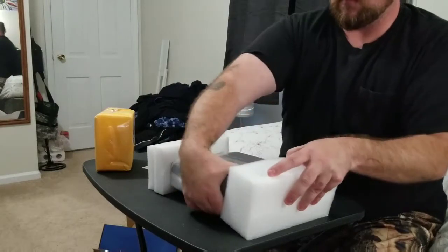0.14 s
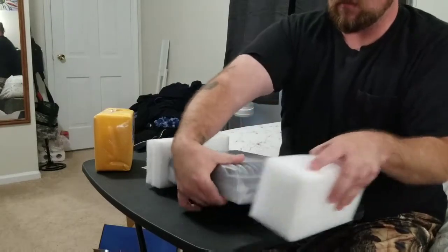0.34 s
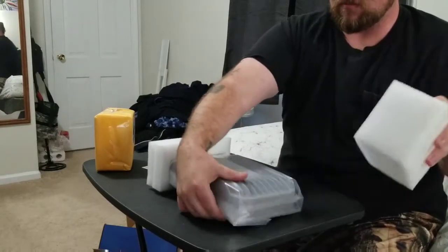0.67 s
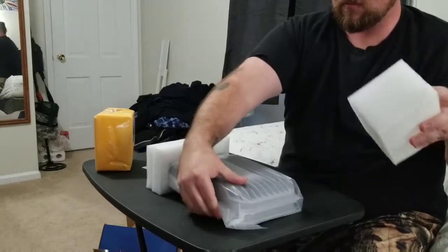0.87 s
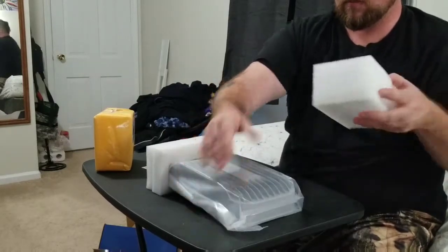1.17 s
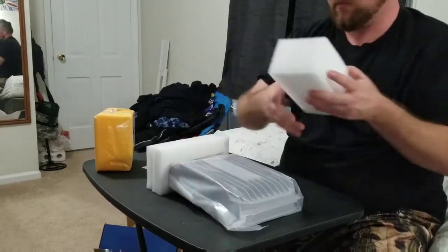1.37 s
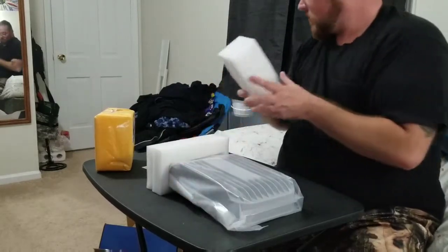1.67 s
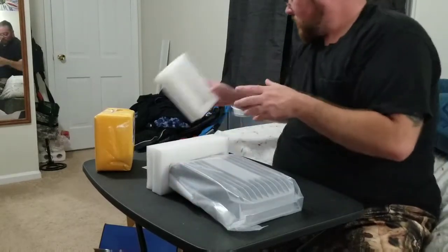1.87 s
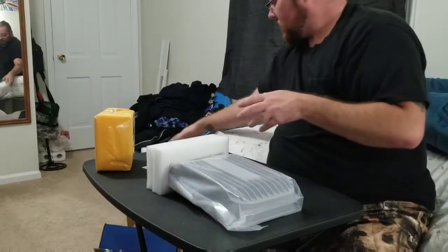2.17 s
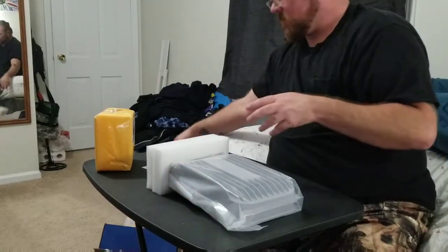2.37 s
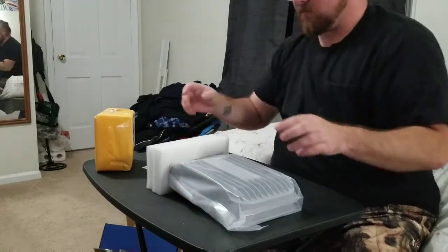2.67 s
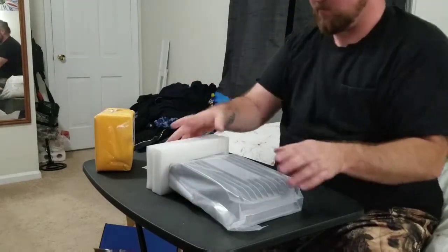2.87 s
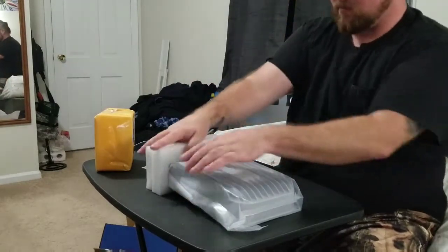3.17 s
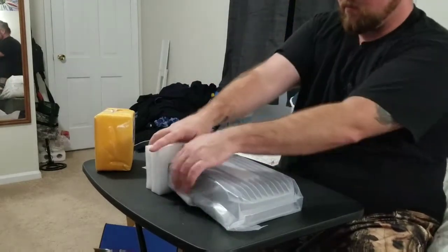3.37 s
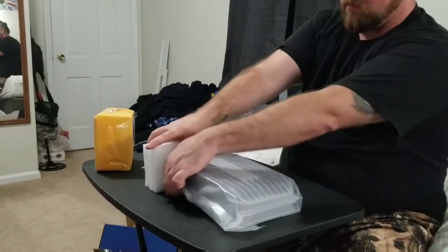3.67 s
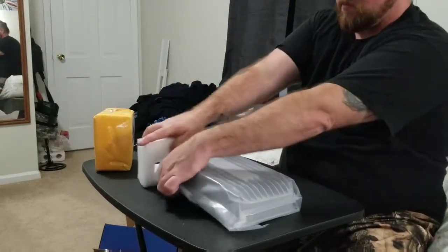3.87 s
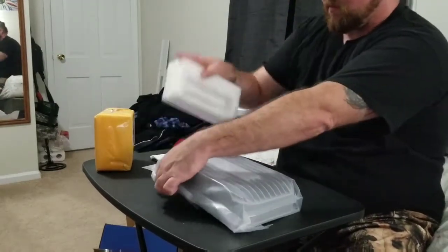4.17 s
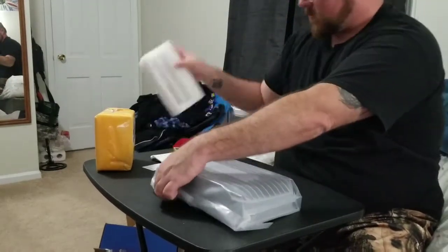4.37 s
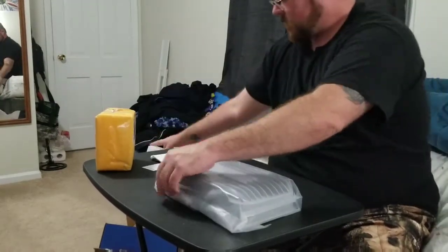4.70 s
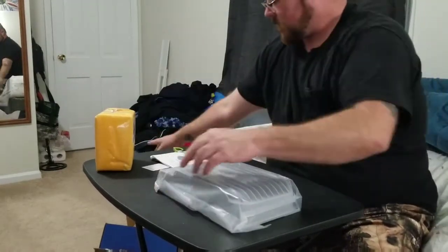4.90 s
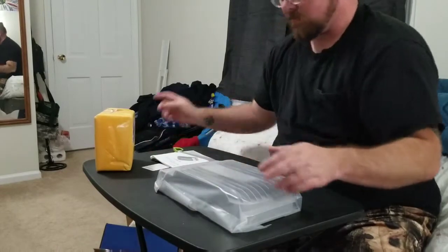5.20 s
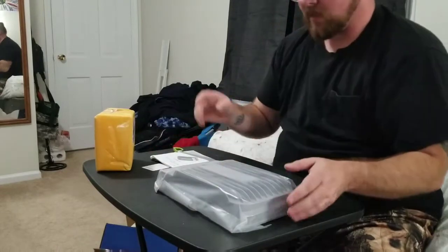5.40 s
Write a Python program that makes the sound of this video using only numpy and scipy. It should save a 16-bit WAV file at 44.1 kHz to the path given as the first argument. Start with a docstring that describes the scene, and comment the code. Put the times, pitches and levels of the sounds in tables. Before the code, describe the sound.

Hands unpack a film-wrapped object: a hollow foam rub and knocks, the object set down with a low thump, a dense burst of plastic crackle, a light tap on foam, a pause, a muffled landing. Then palm slides and sparse film ticks, another softer thump with crinkle, a faint bump. Dry carpeted room, low rumble and faint hiss, near microphones.

```python
"""Hands pull foam blocks off a thing wrapped in plastic film, on a light table in a carpeted bedroom.
Film snaps are short decaying tones with a bright tick; crackle is random clicks, a palm slide is noise.
Random pushes ring the foam, the table and landing blocks; soft blows ring the knocked blocks.
Squeaks are narrow noise. Echoes give the room; shaped noise gives the house's low rumble and hum
and the hiss of two microphones."""
import sys
import numpy as np
from scipy import signal
from scipy.fft import rfft, irfft, next_fast_len
from scipy.io import wavfile
from scipy.ndimage import uniform_filter1d

SR = 44100
rng = np.random.default_rng(int(sys.argv[2]) if len(sys.argv) > 2 else 0)


def generate_wav(sig):
    """Save sig (samples, or channels by samples) to the path in sys.argv[1] as 16-bit PCM at SR."""
    pcm = np.round(np.clip(np.atleast_2d(sig).T, -1, 1) * 32767).astype(np.int16)
    wavfile.write(sys.argv[1], SR, pcm)


N = 244573  # length in samples
STEP = 20  # samples between two points of a slow loudness curve


def from_db(db):
    """Turn decibels into a plain multiplier."""
    return 10 ** (np.asarray(db) / 20)


def rms_one(x):
    """Scale a sound so that its average strength (rms) is 1."""
    return x / np.sqrt(np.mean(x ** 2) + 1e-20)


def panned(x, pan_db, lag=1):
    """Place one sound between left and right; the left side hears it a few samples later."""
    gains = from_db(np.array([pan_db, -pan_db]) / 2).reshape(2, -1)
    left, right = x * gains
    return np.array([np.roll(left, lag), right])


def coloured(x, spectrum):
    """Filter a sound to follow a spectrum, with no sound ahead of its cause (minimum phase); rms 1."""
    hz, db = np.transpose(spectrum)
    grid = np.maximum(np.fft.rfftfreq(8192, 1 / SR), 1)
    log_gain = np.interp(np.log(grid), np.log(hz), db) * np.log(10) / 20
    # folding the cepstrum onto its first half makes the filter minimum-phase
    cepstrum = irfft(log_gain)
    cepstrum[1:4096] *= 2
    cepstrum[4097:] = 0
    response = irfft(np.exp(rfft(cepstrum)))
    return rms_one(signal.fftconvolve(np.atleast_2d(x), response[None])[:, :N])


def resonator(hz, t60):
    """Feedback of one ringing tone that fades by 60 dB in t60 seconds, and its angle per sample."""
    r, w = from_db(-60 / (t60 * SR)), 2 * np.pi * hz / SR
    return [1, -2 * r * np.cos(w), r * r], w


def ring(force, hz, t60):
    """A force sets one tone ringing; a single unit click would start a sine of height 1."""
    feedback, w = resonator(hz, t60)
    return signal.lfilter([0, np.sin(w)], feedback, force + 1e-18)


def shake(force, modes):
    """A force drives several ringing tones that let little through far below or above their pitch."""
    out = 0
    for hz, db, t60 in modes:
        feedback, _ = resonator(hz, t60)
        out = out + from_db(db) * signal.lfilter([1, 0, -1], feedback, force + 1e-18)
    return out


def grains(per_s, spread_db):
    """Random clicks of uneven size, pushing either way."""
    sizes_db = spread_db * np.minimum(rng.exponential(1, N), 4)
    signs = rng.choice([-1, 1], N)
    return from_db(sizes_db) * signs * (rng.random(N) < per_s / SR)


def driven(gains, bodies, soft_hz):
    """Uneven pushes follow each gain and ring one body; a low-pass then softens the sum."""
    out = 0
    for gain, modes in zip(gains, bodies):
        bumps = grains(2000, 1.5)
        out = out + shake(bumps * gain, modes) / np.std(shake(bumps, modes))
    return signal.sosfilt(signal.butter(3, soft_hz, fs=SR, output="sos"), out)


RISE_DB = 13.5  # how far below its top a swell sets in


def swells(rows, linger):
    """Each event rises, holds, then fades steadily in dB; gains are events x layers x time."""
    t = np.arange(0, N + STEP, STEP) / SR
    share = np.array(linger)[:, None]
    out = []
    for start, rise, hold, fade, *top_db in rows:
        since, rise = t - start, max(rise, 1e-3)  # no rise is shorter than 1 ms
        rising_db = -RISE_DB * np.clip(1 - since / rise, 0, 1)
        fading_db = -fade * np.maximum((since - rise) / share - hold, 0)
        layers_db = np.array(top_db[:len(share)])[:, None]
        out.append(from_db(layers_db + rising_db + fading_db) * (since >= 0))
    return np.array(out)


def summed(gains):
    """Overlapping events add in power, giving one gain per layer at every sample."""
    curves = np.sqrt(np.sum(gains ** 2, axis=0))
    return [np.interp(np.arange(N) / STEP, np.arange(len(g)), g) for g in curves]


# narrow squeaks and hoots of rubbed foam, levels before panning:
# (start t/s, length t/s, pitch f/Hz, width f/Hz, level/dB)
SQUEAKS = [(-.04, 0.125, 790, 110, -37), (2.134, 0.058, 3050, 200, -78), (2.285, 0.034, 1390, 100.4, -79),
           (3.024, 0.097, 1740, 400, -63.5), (4.111, 0.025, 1480, 99, -63.5),
           (4.116, 0.051, 1090, 150, -66.5), (4.27, 0.037, 1810, 70, -74), (5.242, 0.11, 446, 49.3, -63.5),
           (5.517, 0.049, 1660, 200, -67.5)]


def squeaks():
    """Rubbed foam squeaks: short narrow bands of noise that swell and fade."""
    out, t, noise = 0, np.arange(N) / SR, rng.standard_normal(N)
    for start, length, hz, width, db in SQUEAKS:
        swell = np.sin(np.pi * np.clip((t - start) / length, 0, 1))
        t60 = np.log(1000) / np.pi / width  # a narrower band rings longer
        out = out + from_db(db) * swell * rms_one(shake(noise, [(hz, 0, t60)]))
    return out


# hand movements, levels before filtering and panning; the linger shares stretch hold and fade:
# (start t/s, rise t/s, hold t/s, fade level/dB per s, crumple level/dB, slide level/dB,
#  foam hollow level/dB, foam walls level/dB, left-over-right level/dB)
MOVES = [(0.0, 0.00081, 0.051, 208, -44.5, -53, -38.5, -40.5, 1.5),
         (0.096, 0.11, 0.06, 200, -61, -65, -62.5, -58.5, 1.5),
         (0.265, 0.013, 0.0025, 450, -48.5, -50, -58, -47, 1.5),
         (0.296, 0.026, 0.032, 174, -53.5, -52.5, -58, -53.5, 2),
         (0.379, 0.003, 0.0068, 355, -51, -72, -49.5, -49.5, 6),
         (0.542, 0.022, 0.06, 295, -53, -62.5, -63, -44.5, 2),
         (0.689, 0.06, .005, 300, -57, -60, -52.5, -51, 5),
         (0.803, .006, .003, 450, -56, -61, -51, -72, -3),
         (0.818, 0.051, 0.013, 190, -40.5, -49.5, -51, -45.5, 1.5),
         (0.93, 0.11, 0.032, 88, -61, -64.5, -60.5, -55.5, 6),
         (1.183, 0.0039, 0.0045, 142, -47.5, -54.5, -68, -60.5, 4.5),
         (1.315, 0.0094, 0.017, 211, -65.5, -88, -90, -79, 4.5),
         (1.468, 0.0089, 0.025, 193, -60, -57.5, -61.5, -55.5, -1),
         (1.536, 0.04, 0.058, 212, -71.5, -60.5, -69.5, -62, 10),
         (1.723, 0.0081, 0.046, 304, -65, -62, -53, -55, 1),
         (1.832, 0.11, 0.032, 242, -73, -66.5, -75, -79, 3),
         (2.114, 0.056, .02, 202, -88, -80, -84, -88, 5.5),
         (2.272, 0.032, .012, 250, -88, -77, -80, -86.5, 0),
         (2.504, 0.014, 0.03, 192, -52.5, -53.5, -46, -45.5, 1),
         (3.038, 0.044, 0.12, 124, -57.5, -55, -70.5, -85, 2),
         (3.344, 0.0054, 0.0096, 222, -52, -59.5, -65.5, -56, 2),
         (3.364, 0.064, 0.022, 206, -61, -59, -87, -72, 1),
         (3.462, 0.013, .003, 193, -51, -53.5, -78, -52.5, 4),
         (3.523, 0.08, 0.021, 282, -52, -53.5, -61, -62, 3),
         (3.69, 0.076, 0.004, 218, -50, -52.5, -65.5, -53.5, 3),
         (3.805, 0.073, 0.04, 112, -56.5, -62, -75, -56.5, 3),
         (3.868, 0.066, .012, 170, -61, -55, -65, -57, 14),
         (3.986, 0.011, .005, 200, -76, -61.5, -66, -74, 6),
         (4.09, .04, 0.033, 194, -83, -71.5, -68.5, -72, 1.5),
         (4.196, 0.12, .025, 89, -81, -66.5, -78, -76, -1),
         (4.394, .07, 0.023, 170, -84, -71.5, -77.5, -92, 8),
         (4.563, 0.0093, 0.035, 150, -67, -72, -68, -72, 7),
         (4.636, 0.073, 0.0068, 400, -50.5, -58, -58, -52, 3.5),
         (4.768, 0.016, 0.0043, 255, -60, -53, -81, -77, 16),
         (5.074, 0.029, 0.004, 292, -62.5, -60, -47.5, -50, 8),
         (5.151, 0.1, 0.018, 246, -64.5, -62, -59, -58, 4),
         (5.499, 0.043, .025, 203, -76, -71, -68.5, -75, 6)]
# how long film, palm, hollow and walls go on: (share of hold and fade time [no unit], one per layer)
MOVE_LINGER = [0.94, 1.01, 0.85, 0.75]


def hand_moves():
    """One hand movement drives film, palm and foam; the side follows the loudest film movement."""
    moves = swells(MOVES, MOVE_LINGER)
    loudest = np.argmax(moves[:, 0], axis=0).repeat(STEP)[:N]
    pan_db = uniform_filter1d(np.array(MOVES)[loudest, -1], size=200)
    return summed(moves), pan_db


# tone colour of crumpling film: (f/Hz, relative level/dB per Hz)
CRACKLE = [(350, -16.5), (600, -30), (678, -26.5), (746, 1), (2280, 3), (4140, -2), (6400, -7), (9370, -39),
           (14300, -30), (15500, -27.5)]


def crackle(gain):
    """Crumpling film: many random clicks, coloured by the sheet."""
    return gain * coloured(grains(4000, 3), CRACKLE)[0]


# tone colour of a palm on foam: (f/Hz, relative level/dB per Hz)
SLIDE = [(350, -34), (600, -8.5), (1060, -17), (1170, -4), (1340, -6.5), (1460, -3), (1940, -1),
         (2440, -14), (2920, -7.5), (4330, -7), (7890, -3.5), (9040, -13), (12900, -9), (15600, -10)]


def slide(gain):
    """A palm rubs over foam: coloured noise, separate on each side, slightly stronger on the left."""
    return gain * coloured(rng.standard_normal((2, N)), SLIDE) * from_db([[.8], [-.8]])


# air in the block's pocket: (f/Hz, relative level/dB, time to fade by 60 dB t/s)
HOLLOW = [(445, 8.5, 0.025), (519, 4, 0.024), (571, -6, 0.089)]
# walls of the foam block: (f/Hz, relative level/dB, time to fade by 60 dB t/s)
WALLS = [(725, -2, 0.019), (789, -13.5, 0.018), (879, 0, 0.023), (997, -1.5, 0.016), (1085, -1, 0.013),
         (1267, -2, 0.02)]


def foam(hollow, walls):
    """Handled foam: small pushes ring the air in its pocket and its walls."""
    return panned(driven([hollow, walls], [HOLLOW, WALLS], soft_hz=2000), 1.5, 9)


# weight coming down on the table, levels before softening; the linger shares stretch hold and fade:
# (start t/s, rise t/s, hold t/s, fade level/dB per s, top level/dB, frame level/dB, legs level/dB)
THUDS = [(0.0, 0.049, 0.0043, 485, -36, -51, -65), (.26, 0.026, 0.01, 300, -56, -63, -98),
         (.36, 0.012, 0.0061, 204, -57, -80, -68), (.561, 0.0026, 0.034, 397, -35, -26.5, -51),
         (.7, 0.093, 0.013, 304.5, -57.5, -68, -65.5), (.822, 0.015, 0.011, 181, -47.5, -50.5, -64),
         (1.0, 0.07, 0.013, 301.5, -55.5, -67, -65), (3.74, 0.062, 0.026, 138, -54, -54.5, -63),
         (4.66, 0.01, 0.033, 398, -42, -40, -50)]
# how long top, frame and legs go on: (share of hold and fade time [no unit], one per layer)
THUD_LINGER = [1.09, 0.43, 3.2]
# ringing of the table top: (f/Hz, relative level/dB, time to fade by 60 dB t/s)
TOP = [(178, -10.5, 0.081), (313, -1.5, 0.031), (350.5, -0.5, 0.091), (399, -6.5, 0.028)]
# ringing of the frame: (f/Hz, relative level/dB, time to fade by 60 dB t/s)
FRAME = [(119, 1, 0.21)]
# ringing of the legs: (f/Hz, relative level/dB, time to fade by 60 dB t/s)
LEGS = [(39.3, -4.5, 0.21), (68, -1, 0.067)]


def table_thuds():
    """Weight on the table: soft pushes ring its top, frame and legs."""
    gains = summed(swells(THUDS, THUD_LINGER))
    return panned(driven(gains, [TOP, FRAME, LEGS], soft_hz=570), 1.2, 7)


# tone colour of house rumble and microphone hiss: (f/Hz, relative level/dB per Hz)
QUIET = [(12, -73), (20, -21), (65, -13), (98, -5.5), (137, -20.5), (221, -17.5), (247, -25), (292, -26.5),
         (510, -37), (693, -42.5), (775, -40.5), (1510, -47), (3130, -49.5), (3800, -49.5), (15800, -50.5)]
# a wavering low tone in the house: (f/Hz, relative level/dB, time to fade by 60 dB t/s)
HUM = [(92.1, 0, 0.42)]
QUIET_DB, HUM_DB = -60, -67  # rms levels in dB before the small left-right tilt


def quiet():
    """The quiet below: coloured noise for rumble and hiss, and noise through a resonance for the hum."""
    noise = from_db(QUIET_DB) * coloured(rng.standard_normal((2, N)), QUIET)
    hum = from_db(HUM_DB) * rms_one(shake(rng.standard_normal(N), HUM))
    return (noise + hum) * from_db([[.4], [-.4]])


ROOM_T60_S = 0.36  # bass echoes fade by 60 dB in this time in s; treble goes sooner
WALL_CUT_HZ = 970  # treble cut per round in Hz for a 50 ms delay; higher for shorter ones
ROOM_DB = -17


def bedroom(x):
    """Room echo: eight feedback delays a side, duller on every round, worked out per frequency."""
    size = next_fast_len(N + SR)
    hz = np.fft.rfftfreq(size, 1 / SR)
    out = np.zeros((2, len(hz)), complex)
    for k, lag in enumerate(rng.uniform(.006, .03, 16)):  # delays in s
        delay = from_db(-60 * lag / ROOM_T60_S) * np.exp(-2j * np.pi * hz * lag)
        loop = delay / (1 + 1j * hz * lag * 20 / WALL_CUT_HZ)
        out[k % 2] += loop / (1 - loop) * (-1) ** (k // 2)
    return from_db(ROOM_DB) * irfft(out * rfft(x, size), size)[:, :N]


# film buckling, levels before panning and the bass cut:
# (start t/s, peak level/dB, pitch f/Hz, treble tick peak level/dB, rustle level/dB)
SNAPS = [(0.1231, -54, 2520, -43, -54), (0.203, -38, 2900, -61, -65), (0.249, -54, 1800, -60, -55.5),
         (0.2743, -35.5, 1440, -32, -57), (0.3853, -33.5, 1810, -46, -50), (0.549, -36, 1360, -58, -62),
         (0.732, -55, 1660, -38, -56), (0.739, -37.5, 2350, -48, -47), (0.8081, -26, 3200, -34.5, -47),
         (0.8618, -33, 2080, -29, -51), (0.8641, -21, 2280, -18.5, -40.5), (0.8699, -29, 2280, -42, -45),
         (0.8756, -27, 2800, -30, -56), (0.9895, -33, 1560, -40.5, -45.5), (1.0213, -34, 2520, -41.5, -53),
         (1.0963, -36.5, 1830, -42, -46.5), (1.1386, -40.5, 1970, -47, -54),
         (1.1835, -30.5, 2060, -34, -47), (1.1884, -32, 2180, -41.5, -65), (1.193, -27.5, 2800, -36, -48),
         (1.2632, -33, 2090, -55, -56), (1.326, -32, 2280, -50, -54), (3.3444, -36, 2240, -43, -62),
         (3.351, -36, 1920, -60, -59), (3.4691, -36, 1710, -27.5, -48.5), (3.4916, -40, 3140, -35, -53.5),
         (3.5894, -39, 1860, -44, -49), (3.6014, -29.5, 2080, -36, -71), (3.6146, -37, 2130, -51, -70),
         (3.7176, -40.5, 2180, -43, -56), (3.7514, -34, 2000, -43, -48), (3.7603, -32.5, 1800, -38, -44.5),
         (3.8354, -37.5, 1660, -40.5, -57), (3.9382, -34, 2040, -42, -48.5), (3.951, -38.5, 1590, -53, -69),
         (4.0062, -44, 2420, -38, -56.5), (4.5756, -44, 2700, -52, -59), (4.639, -46, 1850, -44.5, -59),
         (4.666, -49, 1560, -42, -52.5), (4.7004, -35.5, 1930, -34.5, -49), (4.757, -44, 2080, -45, -57),
         (4.77, -37, 1820, -61, -50), (4.78, -28.5, 2000, -23, -47.5), (4.7854, -29, 2000, -29, -46)]
RUSTLE_T60_S = 0.15  # time for the rustle to fade by 60 dB
FILM_PAN_DB, FILM_PAN_SPREAD_DB = 3, 1.5  # the creases lie left of centre, scattered


def snaps():
    """Each crease flips in a few cycles with a bright tick; the sheet rustles on around the same pitch."""
    out, t = np.zeros((2, N + SR)), np.arange(SR // 4) / SR
    click = signal.sosfilt(signal.butter(2, [3800, 9500], "band", fs=SR, output="sos"), t == 0)
    lags, noise = rng.random(len(SNAPS)), rng.standard_normal((len(SNAPS), 2, len(t)))
    pans = FILM_PAN_DB + FILM_PAN_SPREAD_DB * rng.standard_normal(len(SNAPS))
    for (start, db, hz, tick_db, rustle_db), pan_db, lag, hiss in zip(SNAPS, pans, lags, noise):
        # the flip's decay falls by 60 dB in 4.5 cycles
        flip = np.sin(2 * np.pi * hz * t) * t * from_db(-60 * t * hz / 4.5)
        tick = from_db(tick_db) * click / np.abs(click).max()
        crack = from_db(db) * flip / np.abs(flip).max() + tick
        band = signal.butter(2, [hz / 1.4, hz * 1.4], "band", fs=SR, output="sos")
        # a wide sheet: each side hears partly other creases
        rustle = rms_one(signal.sosfilt(band, hiss + 0.19 * hiss[::-1]))
        sides_db = np.array([[pan_db], [-pan_db]]) / 4
        fade = from_db(rustle_db - 60 * t / RUSTLE_T60_S + sides_db)
        at = round(start * SR)
        out[:, at:at + len(t)] += panned(crack, pan_db, int(3 * lag)) + rustle * fade
    return signal.sosfilt(signal.butter(2, 900, "high", fs=SR, output="sos"), out[:, :N])


# fingers and furniture knocking a foam block, peak levels before a 4 dB cut and panning:
# (start t/s, peak level/dB, softness t/ms, left-over-right level/dB)
KNOCKS = [(0.273, -37, 0.71, -4), (0.383, -32, 0.24, 3), (1.47, -68, 0.37, 6), (1.732, -32.5, 0.095, 7.5),
          (2.508, -46, 0.19, -11), (5.086, -36, 0.32, -0.5), (5.525, -54, 0.3, -1.5)]
# ringing of the block, before chance changes: (f/Hz, relative level/dB, time to fade by 60 dB t/s)
FOAM = [(575, 18, 0.044), (1160, -9, 0.045), (1219, 14, 0.039), (1370, -8, 0.061), (1800, -15, 0.068),
        (1870, 2, 0.096), (1970, -13, .06), (2907, -21, .05)]


def knocks():
    """A soft contact rings all tones of the hollow block, with new strengths each time."""
    out, t = np.zeros((2, N + SR)), np.arange(SR // 3) / SR
    chances = rng.normal(0, 2, (len(KNOCKS), len(FOAM)))  # dB
    for (start, db, soft_ms, pan_db), chance in zip(KNOCKS, chances):
        push = np.exp(-t * 1000 / soft_ms)
        body = sum(from_db(mode_db + c) * ring(push, hz, t60) for (hz, mode_db, t60), c in zip(FOAM, chance))
        at = round(start * SR)
        out[:, at:at + len(t)] += panned(from_db(db - 4.0) * body / np.abs(body).max(), pan_db)
    return out[:, :N]


# a block thrown aside lands, levels before softening; the linger shares stretch hold and fade:
# (start t/s, rise t/s, hold t/s, fade level/dB per s, body level/dB, low push level/dB)
LANDINGS = [(2.505, 0.016, 0.055, 348, -31, -39), (2.65, 0.023, 0.015, 297, -52.5, -61),
            (5.078, 0.031, 0.0045, 350, -47.5, -47.5), (5.17, 0.04, 0.041, 235, -50, -47)]
# how long body and push go on: (share of hold and fade time [no unit], one per layer)
LANDING_LINGER = [0.95, 0.45]
# ringing of the landing block: (f/Hz, relative level/dB, time to fade by 60 dB t/s)
BOUNCE = [(175, -6.5, 0.042), (225, -17.5, 0.31), (266.7, 10, 0.082), (335, 8, 0.027), (376.8, 5, 0.047),
          (400, -9, 0.12), (427, -25, .08)]
# low push under the landing: (f/Hz, relative level/dB, time to fade by 60 dB t/s)
PUSH = [(110, 0, 0.14)]


def landings():
    """A thrown block lands: uneven pushes ring its body and a low push."""
    gains = summed(swells(LANDINGS, LANDING_LINGER))
    return panned(driven(gains, [BOUNCE, PUSH], soft_hz=520), 1.1, 11)


def scene():
    """Film, foam and table, their room, and the quiet below."""
    (film, palm, hollow, walls), pan_db = hand_moves()
    near = panned(crackle(film) + squeaks(), pan_db, 3) + foam(hollow, walls) + snaps() + knocks()
    low = table_thuds() + landings()
    room = bedroom(near.mean(axis=0) + from_db(-12.0) * low.mean(axis=0))
    return near + low + room + slide(palm) + quiet()


PORTS_HZ = 300  # below this the two microphones hear nearly the same
CUTOFF_HZ = 16100  # top of the treble


def record(dry):
    """Two close microphones differ little in the bass; the top is cut."""
    mid, side = (dry[0] + dry[1]) / 2, (dry[0] - dry[1]) / 2
    bass = signal.sosfilt(signal.butter(1, PORTS_HZ, fs=SR, output="sos"), side)
    side = side - .8 * bass
    mid = mid + 0.1 * bass
    stereo = np.array([mid + side, mid - side])
    return signal.sosfilt(signal.cheby2(12, 70, CUTOFF_HZ, fs=SR, output="sos"), stereo)


dry = scene()
out = record(dry)
generate_wav(out)
```